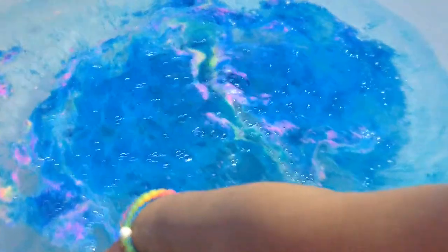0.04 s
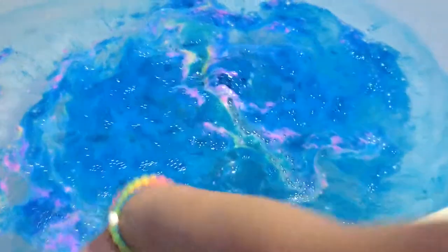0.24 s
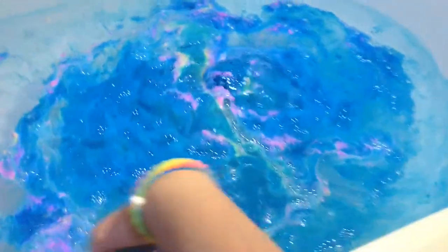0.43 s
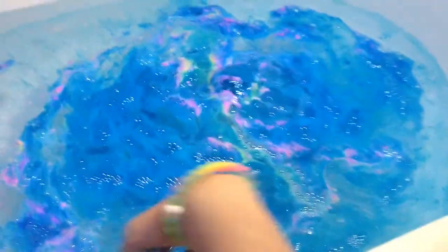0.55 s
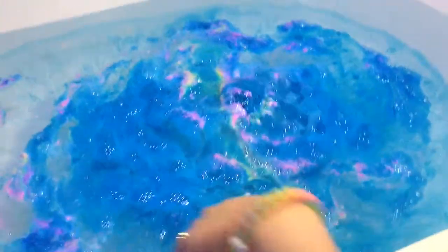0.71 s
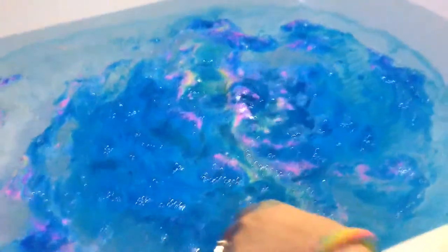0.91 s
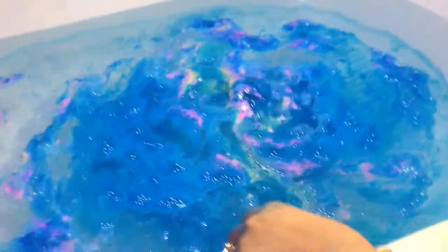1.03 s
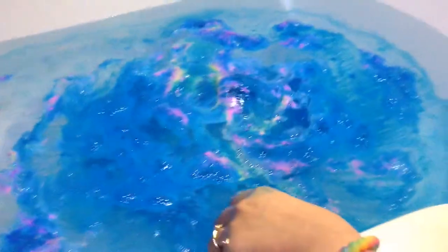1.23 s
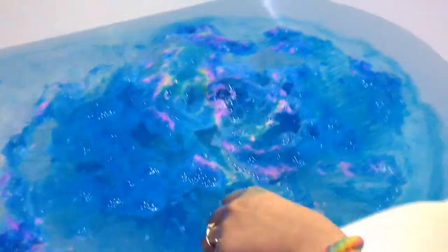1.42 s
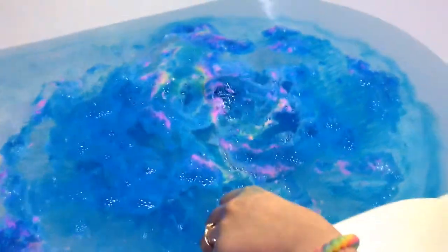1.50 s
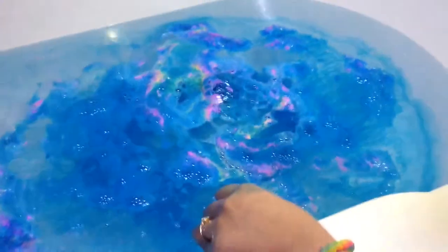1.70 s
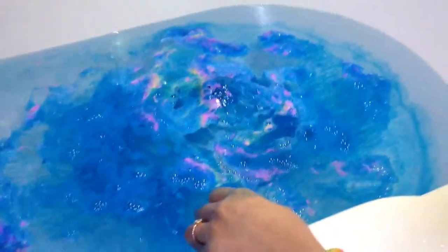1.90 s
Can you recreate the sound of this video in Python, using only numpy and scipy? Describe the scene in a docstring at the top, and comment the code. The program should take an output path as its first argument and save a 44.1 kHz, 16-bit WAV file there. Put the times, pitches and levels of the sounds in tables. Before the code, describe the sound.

A bath bomb fizzes in a tub, a fine hiss of tiny bubbles over soft, dull churning. It starts faint, swells by 0.4 seconds and again near 0.9, then holds until about 2. Two dull, close bumps land at 0.2 and 0.3 seconds. A few low plops dot the fizz, the clearest near 1 second, and a small drip sounds at 1.2. Tub and tiles add a short ring.

```python
"""A bath bomb fizzes in a tub of water, heard from one microphone above the tub.
Thousands of tiny bubbles burst at the surface, over the soft churning of rising gas.
Early on something bumps twice, dull and close by; a few low plops and one small drip sound.
Tub and tiles add a short ring, and the microphone's faint hiss lies underneath."""
import sys
import numpy as np
from scipy import signal
from scipy.io import wavfile

SR = 44100
rng = np.random.default_rng(int(sys.argv[2]) if len(sys.argv) > 2 else 0)


def master_out(mix):
    """Clip the mix to full scale and print it as 16-bit PCM to the path in sys.argv[1]."""
    frames = np.transpose(np.atleast_2d(mix))
    ceiling = np.clip(frames, -1, 1)
    pcm = np.round(ceiling * 32767).astype(np.int16)
    wavfile.write(sys.argv[1], SR, pcm)


N = 85995


def fizz():
    """Tiny bubbles burst at the surface below the microphone, each a ping of a few cycles."""
    # Each row: time in seconds, relative level of the bursting bubbles in dB.
    swell = [(0, -64.5), (.17, -63), (.27, -57), (.32, -51), (.385, -48), (.5, -50), (.64, -52.5),
             (.75, -49.5), (.86, -47.5), (.98, -53), (1.22, -53.5), (1.35, -53.5), (1.5, -52.5),
             (1.64, -51.5), (1.8, -53.5), (1.95, -54)]
    # Each row: frequency in Hz, relative spectral level of a burst in dB.
    spectrum = [(1500, -51), (3400, -20), (4150, -13), (4800, -4), (5400, -1.5), (6200, -5.5), (7100, -14),
                (9000, -22), (12000, -33.5), (15000, -37)]
    bursts = colour(clicks(per_s=6500, spread_db=1), spectrum)
    return amp(0.5) * level(swell) * unit(room(bursts, wet_db=-8))


def churn():
    """Rising gas stirs the water in the tub into dense, dull gurgles."""
    # Each row: time in seconds, relative level of the churning in dB.
    swell = [(0, -63.5), (.16, -61.5), (.3, -55.5), (.42, -53.5), (.65, -56), (.86, -54), (1.05, -55.5),
             (1.22, -55.5), (1.32, -56.5), (1.56, -56), (1.65, -53.5), (1.72, -55.5), (1.77, -55),
             (1.81, -57), (1.95, -55.5)]
    # Each row: frequency in Hz, relative spectral level of a gurgle in dB.
    spectrum = [(30, -32), (60, -12), (110, -9.5), (190, 1), (360, .5), (550, -1), (750, -6.5), (1200, -9),
                (2000, -12.5), (3500, -15.5), (8000, -26.5), (15000, -42)]
    gurgles = colour(clicks(per_s=3000, spread_db=0), spectrum)
    return amp(2) * level(swell) * gurgles


def bumps():
    """Close by, each bump brushes, thuds and scuffs; the bumped body rings briefly and is damped."""
    # Each row: contact time in seconds, thud gain in dB, thud width in seconds, ring gain in dB,
    # scuff gain in dB, scuff tilt in dB per octave, brush in dB against the scuff, scuff t60 in seconds.
    hits = [(.2017, -10.5, 0.0019, -18, -22, -0.86, -5, 0.13),
            (.3302, -10, .0019, -18.5, -17, 0.5, -18, 0.086)]
    # Each row: a mode's frequency in Hz, its t60 in seconds before damping,
    # its relative level in dB at the first bump and at the second.
    modes = [(117.5, 0.069, -1.5, -1.5), (147, 0.099, -5, 0), (170, 0.061, 5.5, -8.5),
             (216, 0.3, -14.5, -13), (298.3, 0.053, -29, 7), (337.8, 0.136, -5.5, -14),
             (388, 0.087, -6.5, -4.5), (454.6, 0.12, -30, -14.5), (508.3, 0.066, -2, -11),
             (630, 0.12, -7, -13), (752, 0.039, -28, -4.5), (835, .08, -8.5, -11), (899, .08, -11, -12),
             (1171, 0.044, -15, -6)]
    # Each row: frequency in Hz, relative spectral level of the scuff in dB before the tilt.
    spectrum = [(30, -31), (70, -5), (130, -0.5), (450, 4.5), (590, -5.5), (800, -2.5), (1200, -3.5),
                (1600, -8), (2500, -16), (4000, -21.5), (7000, -33.5), (11000, -41), (15000, -51)]
    brush_s, scuff_rise_s, scuff_hold_s = 0.021, 0.0033, 0.0095
    thud_centre_s, ring_rise_s, ring_hold_s = 0.0068, 0.0034, 0.0075
    damped_after_s, damp_s = 0.046, 0.011
    out = np.zeros(N)
    t = np.arange(SR // 4) / SR - brush_s  # zero at contact; the brush comes just before
    after = np.maximum(t, 0)
    damping = np.exp(-np.maximum(t - damped_after_s, 0) / damp_s)
    press = np.minimum(after / ring_rise_s, 1)
    ring_age = np.maximum(t - ring_hold_s, 0)
    scuff_age = np.maximum(t - scuff_hold_s, 0)
    brush_ramp = np.clip(1 + t / brush_s, 0, 1) * (t < scuff_rise_s)
    for k, (start, thud_db, width, ring_db, scuff_db, tilt_db, brush_db, scuff_t60) in enumerate(hits):
        u = (t - thud_centre_s) / width
        thud = (u ** 2 - 1) * np.exp(-u ** 2 / 2)  # one low shove of pressure
        ring = sum((-1) ** i * amp(dbs[k] - 60 * ring_age / t60) * np.sin(2 * np.pi * hz * after)
                   for i, (hz, t60, *dbs) in enumerate(modes))
        contact = np.minimum(after / scuff_rise_s, 1) * amp(-60 * scuff_age / scuff_t60)
        grit = rng.standard_normal(len(t))
        scuff = contact * colour(grit, spectrum, tilt_db)
        brush = amp(brush_db) * brush_ramp * colour(grit, spectrum, tilt_db=-6.5)
        body = amp(ring_db) * press * ring + amp(scuff_db) * (scuff + brush)
        add(out, start - brush_s, amp(thud_db) * thud + damping * body)
    return room(out, wet_db=-41)


def plops_and_drip():
    """Low plops sag in pitch within a few cycles; the bubbles of a drip ring and rise."""
    # Each row: start in seconds, level in dB, starting pitch in Hz.
    plops = [(.03, -51, 206), (0.07, -49, 263), (0.312, -35, 290), (0.449, -41, 274), (0.57, -46, 235),
             (0.9634, -33, 315), (1.616, -47, 262), (1.643, -48, 290)]
    # Each row: start in seconds, level in dB, starting pitch in Hz, t60 in seconds.
    drip_bubbles = [(1.1708, -42.5, 2840, 0.021), (1.179, -58, 2680, 0.39)]
    onset_s, plop_fade_s = 0.001, 0.015
    sag_oct_per_s, rise_hz_per_s = 76.5, 3700
    out = np.zeros(N)
    t = np.arange(SR // 8) / SR
    onset = np.minimum(t / onset_s, 1)
    for start, db, hz in plops:
        turns = np.cumsum(hz * 2 ** (-sag_oct_per_s * t)) / SR
        add(out, start, amp(db) * onset * np.exp(-(t / plop_fade_s) ** 2) * np.sin(2 * np.pi * turns))
    for start, db, hz, t60 in drip_bubbles:
        turns = np.cumsum(hz + rise_hz_per_s * t) / SR
        add(out, start, onset * amp(db - 60 * t / t60) * np.sin(2 * np.pi * turns))
    return room(out, wet_db=-36)


def room(x, wet_db, t60_s=0.9):
    """Tub and tiles reflect a sound as a short ring, arriving 2 ms behind it."""
    t = np.arange(SR // 2) / SR
    tail = rng.standard_normal(len(t)) * amp(-60 * t / t60_s) * (t > .002)
    return x + amp(wet_db) * signal.oaconvolve(x, tail / np.linalg.norm(tail))[:N]


def hiss():
    """The microphone's own faint, steady noise."""
    # Each row: frequency in Hz, relative spectral level in dB.
    spectrum = [(100, 13.5), (3000, -10.5), (8000, 1.5), (15000, -6)]
    return amp(-67) * colour(rng.standard_normal(N), spectrum)


def clicks(per_s, spread_db):
    """Clicks at random times; a spread above zero makes a few of them larger."""
    size = amp(spread_db * np.minimum(rng.exponential(1, N), 5))
    return size * rng.choice([-1, 1], N) * (rng.random(N) < per_s / SR)


def colour(x, points, tilt_db=0, size=4096):
    """Causal filter through (Hz, dB) points, tilted per octave; the result has rms 1."""
    hz = abs(np.fft.fftfreq(size, 1 / SR)) + 1
    point_hz, point_db = np.transpose(points)
    db = np.interp(np.log(hz), np.log(point_hz), point_db) + tilt_db * np.log2(hz)
    minimum_phase = np.exp(np.conj(signal.hilbert(np.log(amp(db)))))
    taps = np.fft.ifft(minimum_phase).real[:size // 2]
    return unit(signal.oaconvolve(x, taps)[:len(x)])


def level(points):
    """A gain curve through (seconds, dB) points."""
    return amp(np.interp(np.arange(N) / SR, *np.transpose(points)))


def amp(db):
    """Decibels to gain."""
    return 10 ** (np.asarray(db) / 20)


def unit(x):
    """Scales to rms 1."""
    return x / np.sqrt(np.mean(x ** 2) + 1e-20)


def add(mix, start_s, sound):
    """Mixes a sound in at a time."""
    part = mix[max(round(start_s * SR), 0):][:len(sound)]
    part += sound[:len(part)]


def scene():
    """Everything at one microphone above the tub."""
    return (fizz() + churn() + bumps() + plops_and_drip() + hiss())[None]


def record(dry):
    """The recorder's bass cut and band limit."""
    low_cut_hz, top_hz = 104.3, 15330
    bass_cut = signal.butter(2, low_cut_hz, "highpass", fs=SR, output="sos")
    band_limit = signal.firwin(801, top_hz, window=("kaiser", 9), fs=SR)
    return signal.oaconvolve(signal.sosfilt(bass_cut, dry), band_limit[None], "same")


dry = scene()
out = record(dry)
master_out(out)
```